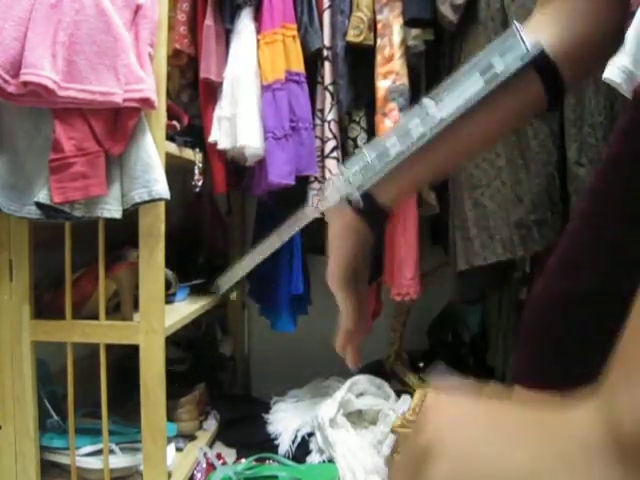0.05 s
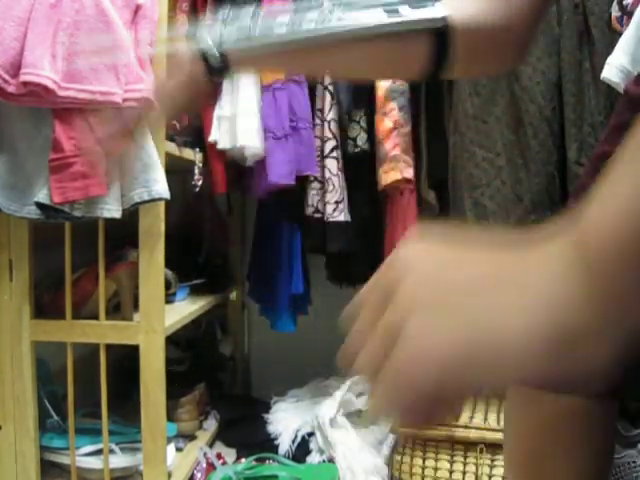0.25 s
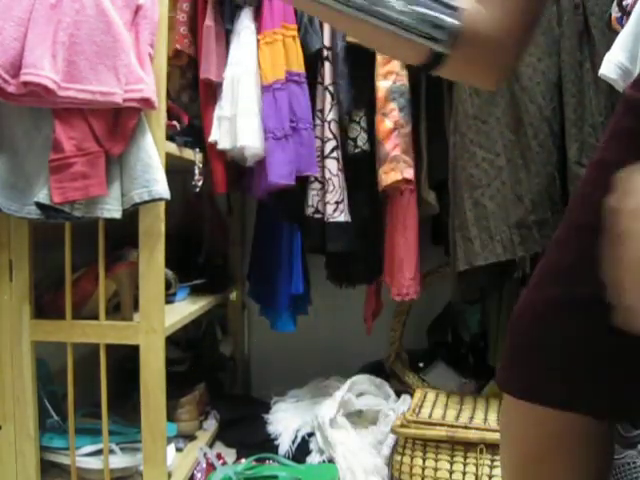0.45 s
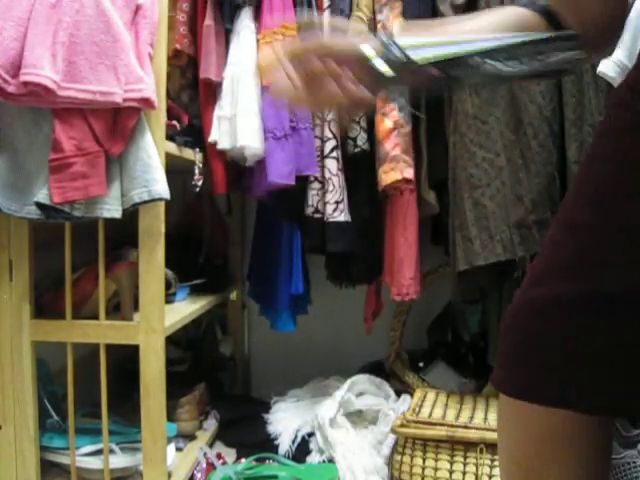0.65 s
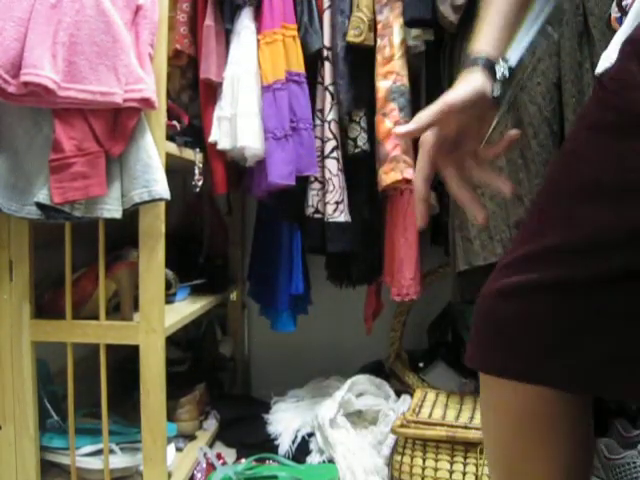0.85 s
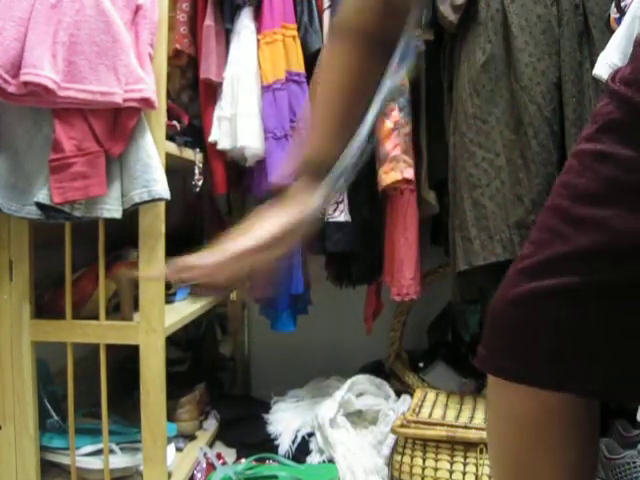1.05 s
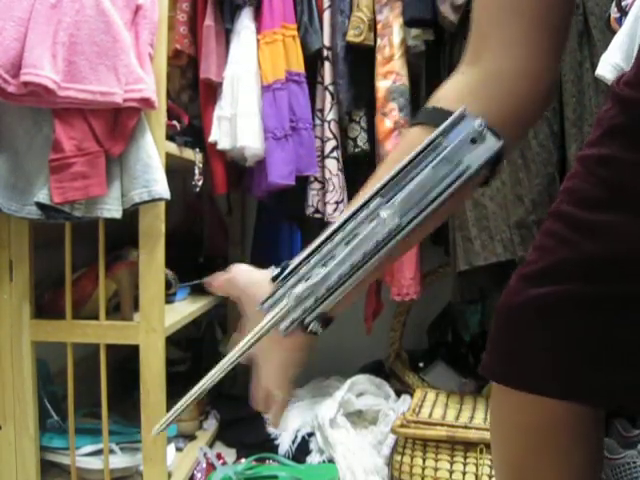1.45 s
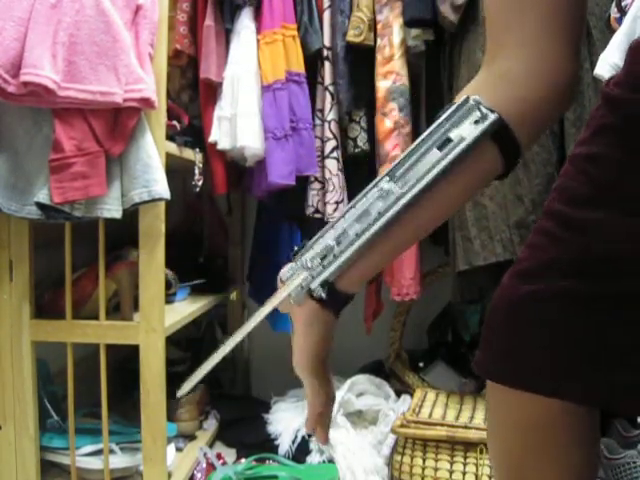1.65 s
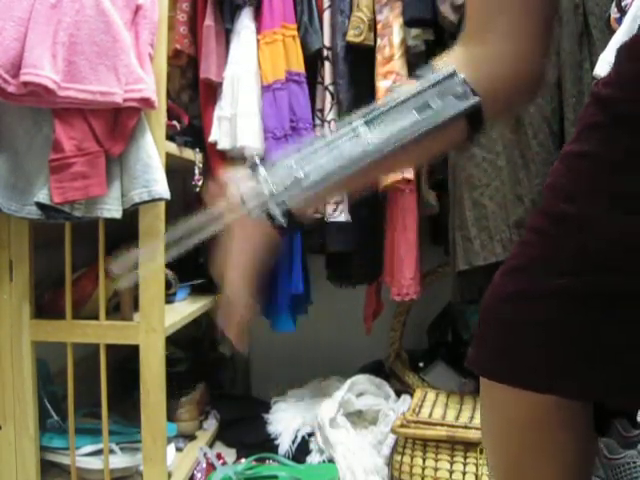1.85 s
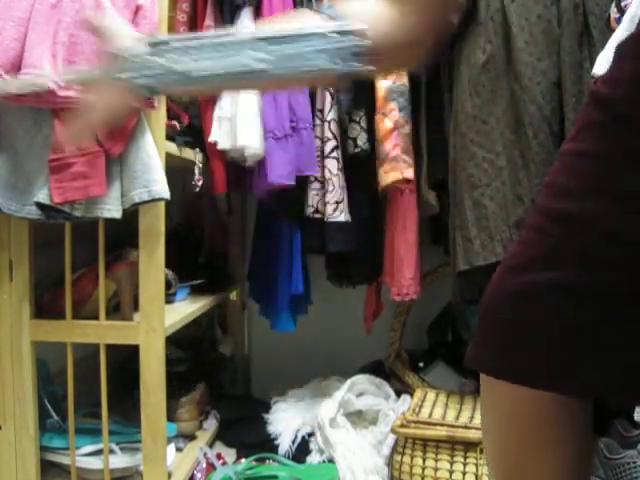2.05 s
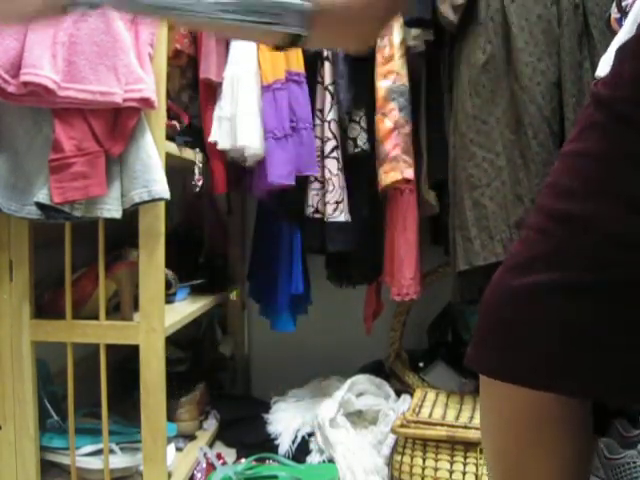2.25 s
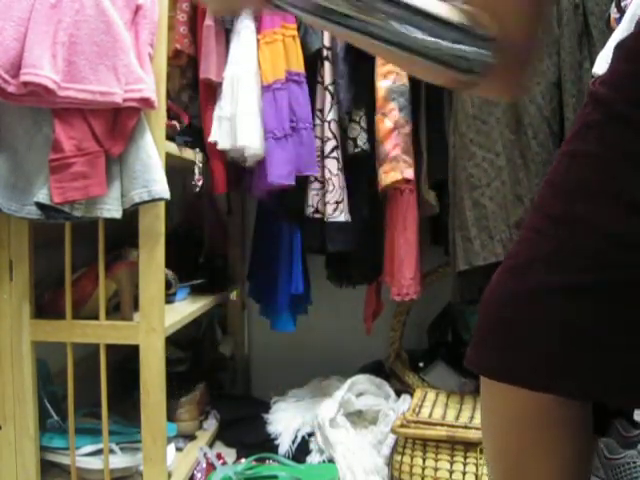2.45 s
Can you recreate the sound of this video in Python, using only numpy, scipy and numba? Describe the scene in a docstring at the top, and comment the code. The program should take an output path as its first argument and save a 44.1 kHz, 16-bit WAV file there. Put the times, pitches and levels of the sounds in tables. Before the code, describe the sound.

A homemade wrist blade slides into its housing at about 0.2 seconds with a bright metallic scrape and rattling clicks. It rattles briefly near 0.9 seconds, followed by a soft arm bump, then scrapes out and hits its stop with a sharp clack around 1.1. From 2.15 to 2.35 it clicks, scrapes and clacks back in. Everything is close, over faint arm rustle and low room noise.

```python
"""Close by in a quiet, cloth-filled room, an arm rustles faintly over a low room noise.
A homemade wrist blade slides back into its housing: the catch clicks, stick-slip friction scrapes
along the rail, the blade rattles and clacks against the end stop. The arm swings with a soft bump,
shifting the blade in its rail, and flicks it out. A second later the blade slides home again.
Each impact rings the housing and the blade's modes; hanging clothes soon absorb the reflections."""
import sys
import numpy as np
from scipy import signal
from scipy.fft import rfft, irfft
from scipy.io import wavfile
from scipy.ndimage import uniform_filter1d
from numba import njit

SR = 44100
rng = np.random.default_rng(int(sys.argv[2]) if len(sys.argv) > 2 else 0)


def file_out(sig):
    """Save sig as 16-bit WAV at sys.argv[1]."""
    # one column per channel
    cols = np.atleast_2d(sig).T
    # limit, then scale
    lim = np.clip(cols, -1, 1)
    pcm = np.round(lim * 32767).astype(np.int16)
    wavfile.write(sys.argv[1], SR, pcm)


N = 114660
T = np.arange(N) / SR


def undb(db):
    return 10 ** (np.asarray(db) / 20)


def unit(x):
    return x / np.sqrt(np.mean(x ** 2))


def fade(t, t60):
    """Exponential damping: 60 dB down after t60 seconds."""
    return np.exp(-np.log(1000) * t / t60)


def curve(points):
    """Amplitude envelope through (s, dB) points, silent outside them."""
    s, db = np.array(points).T
    return undb(np.interp(T, s, db)) * (T >= s[0]) * (T <= s[-1])


def colour(x, points, tilt=0, focus_hz=1000, focus_db=0):
    """Minimum-phase filter of unit power: (Hz, dB) points, treble tilt in dB per octave, one focus band."""
    size, tilt_from_hz, focus_octaves = 2048, 7200, 0.11
    hz, db = np.array(points).T
    octave = np.log2(np.maximum(np.arange(size // 2 + 1) * SR / size, 10))
    db = np.interp(octave, np.log2(hz), db) + tilt * np.maximum(octave, np.log2(tilt_from_hz))
    db += focus_db / (1 + ((octave - np.log2(focus_hz)) / focus_octaves) ** 2)
    cepstrum = irfft(np.log(undb(db)))
    cepstrum[1:size // 2] *= 2  # folding makes the filter causal
    cepstrum[size // 2 + 1:] = 0
    response = irfft(np.exp(rfft(cepstrum)))
    return signal.fftconvolve(x, response / np.linalg.norm(response))[:len(x)]


def noise(points):
    return unit(colour(rng.standard_normal(N), points))


@njit
def moving_band(x, hz, width):
    """State-variable band-pass with a moving centre, gain 1 there."""
    y, band_state, low_state = np.empty(len(x)), 0., 0.
    for i in range(len(x)):
        g, damping = np.tan(np.pi * hz[i] / SR), width / hz[i]
        band = (band_state + g * (x[i] - low_state)) / (1 + g * (g + damping))
        band_state = 2 * band - band_state
        low_state += 2 * g * band
        y[i] = damping * band
    return y


# Spectrum of the room noise. Each row: frequency in Hz, relative level in dB.
ROOM_SPECTRUM = [(12, -30), (20, 0), (113, -5.5), (198, -12), (319, -7.5), (388, -14.5), (459, -12.5),
                 (499, -17.5), (558, -8.5), (738, -17), (976, -18.5), (2080, -23.5), (2320, -27),
                 (2990, -26), (4540, -29.5), (7310, -33.5), (16000, -42.5)]


def room_noise():
    """Stationary random noise, strongest in the deep bass."""
    return undb(-55) * noise(ROOM_SPECTRUM)


# Envelopes of arm rustle, room and body rumble, and arm bump. Each row: time in seconds, level in dB.
RUSTLE_LEVELS = [(0, -57.5), (.05, -59), (.09, -65), (.22, -75), (.45, -67), (.6, -72), (.76, -64.5),
                 (.82, -58.5), (1.2, -65), (1.42, -68), (1.68, -62.5), (1.9, -69.5), (2.1, -67), (2.4, -69),
                 (2.6, -82)]
RUMBLE_LEVELS = [(0, -55.5), (.25, -59), (.4, -82), (.65, -67), (.85, -58.5), (1.3, -68), (1.65, -57.5),
                 (2.05, -57.5), (2.3, -60), (2.6, -58)]
BUMP_LEVELS = [(.94, -63), (.96, -50), (.97, -41), (.982, -53.5), (1.0, -52), (1.03, -64.5)]
# Their spectra. Each row: frequency in Hz, relative level in dB.
RUSTLE_SPECTRUM = [(150, -3.5), (600, 12.5), (1500, 1.5), (3000, -2.5), (7000, -4.5), (11000, -9.5),
                   (16000, -16.5)]
RUMBLE_SPECTRUM = [(20, 2.5), (35, 2.5), (60, -1.5), (110, -7), (170, -12), (260, -15.5), (500, -20),
                   (2000, -44)]
BUMP_SPECTRUM = [(30, -10), (90, 0.5), (200, -12.5), (320, -8.5), (620, -5.5), (900, -23.5), (3000, -37)]


def arm():
    """Amplitude-modulated noise: rustle, rumble and a soft bump follow the arm's motion."""
    rustle = noise(RUSTLE_SPECTRUM) * curve(RUSTLE_LEVELS)
    rumble = noise(RUMBLE_SPECTRUM) * curve(RUMBLE_LEVELS)
    bump = noise(BUMP_SPECTRUM) * curve(BUMP_LEVELS)
    return rustle + rumble + bump


def room_reflections(x, level_db=-12.5, delay_s=0.0013, treble_hz=8200):
    """Porous absorption: hanging clothes soon swallow the reflections, the treble first."""
    t = T[:SR // 4]
    echoes = rng.standard_normal(len(t)) * (t > delay_s)
    low = signal.sosfilt(signal.butter(4, treble_hz, fs=SR, output="sos"), echoes)
    high = signal.sosfilt(signal.butter(4, treble_hz, "high", fs=SR, output="sos"), echoes)
    tail = low * fade(t, t60=0.11) + high * fade(t, t60=0.066)
    response = colour(tail, [(200, 4), (4500, -10.5), (9000, -8), (16000, -0.5)])
    return x + undb(level_db) * signal.fftconvolve(x, response / np.linalg.norm(response))[:N]


def friction(size, slips_per_s=5400, spread_db=3):
    """Stick-slip friction of metal on metal: a dense train of uneven impulses."""
    slips = (rng.random(size) < slips_per_s / SR) * rng.choice([-1., 1.], size)
    return unit(slips * undb(spread_db * np.clip(rng.standard_normal(size), -2, 2)))


# Response of the housing to friction. Each row: frequency in Hz, relative level in dB.
SCRAPE_SPECTRUM = [(200, -41), (700, -34), (1300, -22), (2100, -16.5), (2600, -7.5), (3600, -6.5),
                   (4400, 1.5), (7300, -1.5), (10300, -12), (11700, -11), (13200, -28), (16000, -22.5)]
# Envelope of the blade's shifting. Each row: time in seconds, level in dB.
SHIFT_LEVELS = [(.81, -74.5), (.83, -55.5), (.852, -48), (.87, -28.5), (.895, -64), (.907, -87),
                (.93, -60.5), (.944, -42.5), (.954, -51), (.965, -45), (.985, -61.5), (1.0, -83.5)]


def shift():
    """Light friction excites the housing as the swinging arm shifts the blade in its rail."""
    return colour(friction(N) * curve(SHIFT_LEVELS), SCRAPE_SPECTRUM, tilt=.3, focus_hz=3060, focus_db=9.5)


# Scrape envelopes of strokes 0, 1 and 2. Each row: time in seconds, level in dB.
FIRST_RETURN_LEVELS = [(.222, -60.5), (.245, -40), (.256, -29), (.275, -30.5), (.287, -37.5), (.294, -18.5),
                       (.301, -34), (.307, -25), (.320, -36), (.332, -23.5), (.345, -32), (.36, -39),
                       (.372, -70)]
THROW_LEVELS = [(1.003, -65.5), (1.016, -45), (1.025, -26), (1.040, -29.5), (1.058, -26.5), (1.068, -29.5),
                (1.088, -37.5), (1.10, -61)]
SECOND_RETURN_LEVELS = [(2.198, -48), (2.21, -33), (2.225, -39.5), (2.241, -39.5), (2.248, -27.5),
                        (2.259, -35.5), (2.266, -27), (2.278, -25), (2.30, -32.5), (2.326, -27.5),
                        (2.352, -53.5), (2.37, -58)]
# Rail resonances. Each row: frequency in Hz, bandwidth in Hz, relative gain in dB in strokes 0, 1 and 2.
RAIL_MODES = [(1940, 170, -18, -5, -2.5), (2680, 100, -1, -16, 7), (2902, 100, 1.5, -6.5, 2),
              (4150, 52, 0.5, 0, 18), (4345, 350, -4.5, 8, -10), (4960, 88, -5.5, 2, 7.5),
              (5750, 140, 16.5, 7, -4.5), (7000, 160, 1.5, -6, -19), (9300, 600, -15.5, -2, -18)]
# The band that follows the contact point, one list per stroke. Each row: time in seconds, centre in Hz.
CONTACT_GLIDES = [
    [(.256, 5060), (.30, 4190), (.32, 3530), (.335, 2600)],
    [(1.015, 4230), (1.036, 4150), (1.055, 5400)],
    [(2.24, 4470), (2.28, 4380), (2.295, 4900), (2.33, 4250)],
]


def scrape(levels, stroke, tilt, glide_db):
    """Forced vibration: slips drive the housing, the rail and a band gliding with the contact point."""
    start, size = int(levels[0][0] * SR), SR // 4
    span, out = slice(start, start + size), np.zeros(N)
    impulse = signal.unit_impulse(SR // 20)
    response = colour(impulse, SCRAPE_SPECTRUM, tilt)
    for hz, width, *stroke_db in RAIL_MODES:
        b, a = signal.iirpeak(hz, hz / width, fs=SR)
        response += 2 * undb(stroke_db[stroke]) * signal.lfilter(b, a, impulse)
    force = curve(levels)[span]
    centre_hz = np.interp(T[span], *np.array(CONTACT_GLIDES[stroke]).T)
    glide = friction(size)
    for _ in range(2):  # two passes, each 520 Hz wide
        glide = moving_band(glide, centre_hz, 520.)
    body = signal.fftconvolve(friction(size) * force, response / np.linalg.norm(response))[:size]
    out[span] = body + undb(glide_db) * unit(glide) * force
    return out


# Free vibration of the blade. Each row: frequency in Hz, relative level in dB, 60 dB decay in seconds.
RINGING_MODES = [(2538, -11, 0.063), (2877, -7.5, .07), (3240, -8, .05), (4190, -3.5, .07), (4390, -7, .09),
                 (4870, -14.5, 0.081), (5488, -5, 0.036), (5830, -5, 0.037), (7500, -11.5, .07),
                 (8430, -8.5, 0.075), (9040, -12.5, .05), (9860, -15, 0.078)]


def impacts(rows, spectrum, ring_db, crack=1.1, crack_s=.0005):
    """Impulse response: a sharp crack, a dense short ring of the housing and the blade's damped modes."""
    out, t = np.zeros(2 * N), T[:SR // 8]
    hz, db, t60 = np.array(RINGING_MODES).T
    modes = np.array([np.sin(2 * np.pi * f * t) * fade(t, decay) for f, decay in zip(hz, t60)])
    for start_s, level_db, tilt, housing_t60, focus_hz, focus_db in rows:
        envelope = fade(t, housing_t60) * (1 + crack * np.exp(-t / crack_s))
        burst = rng.choice([-1., 1.], len(t)) * envelope
        housing = colour(burst, spectrum, tilt, focus_hz, focus_db) / 2
        scatter, polarity = rng.standard_normal((len(hz), 2)).T
        mode_db = db + tilt * np.log2(hz / np.median(hz)) + 1.5 * scatter
        ring = (np.sign(polarity) * undb(mode_db)) @ modes
        start = int(start_s * SR)
        out[start:start + len(t)] += undb(level_db) * (housing + undb(ring_db) * ring)
    return out[:N]


# Catch clicks and rattles, then end-stop clacks. Each row: start in seconds, level in dB, tilt in dB per
# octave, housing's 60 dB decay in seconds, band the contact favours or damps in Hz, its gain in dB.
RATTLE_HITS = [(.2312, -18, 2.5, 0.05, 4900, -21.5), (.2460, -16, -3.5, .02, 7560, 15),
               (.2511, -7, 4, .022, 5900, 15), (.2695, -16, -1.5, 0.032, 6300, 6.5),
               (.2910, -22, 5, 0.022, 2600, 1.5), (.2945, -17, -20, 0.054, 5500, 22.5),
               (.3123, -17, -5.5, .02, 3300, 2.5), (.3251, -10.5, -8, .011, 3100, 8.5),
               (.3580, -22.5, -11.5, 0.015, 3000, 3), (.7073, -34, -14, 0.037, 2770, 3),
               (.7187, -36, -17.5, 0.037, 4420, 16.5), (.8515, -30, -5.5, 0.014, 3030, 14.5),
               (.8657, -16.5, -2.5, 0.012, 5880, 6), (.8732, -19, -4, 0.031, 4460, 8.5),
               (.8850, -29.5, -4.5, .015, 5800, 2), (.8908, -19, 10, 0.018, 8300, 17),
               (.9134, -42, -0.5, 0.027, 7000, 5.5), (.9334, -39, 6.5, .025, 6370, 0),
               (1.0785, -23.5, 9.5, 0.013, 5390, 1.5), (1.0832, -27.5, 0, 0.028, 1838, 15),
               (1.1115, -25, 6.5, 0.053, 4500, 10), (1.203, -51.5, -10, 0.048, 5600, 17),
               (2.1526, -14, -2.5, 0.037, 5640, -20.5), (2.1758, -36, 10, 0.023, 4320, 0.5),
               (2.1977, -23, 10.5, 0.015, 8400, 7), (2.2041, -19.5, -11.5, .035, 5700, 10.5),
               (2.2631, -31.5, 2.5, .025, 4200, 27), (2.2905, -13.5, 4.5, 0.027, 4900, 16),
               (2.2995, -9, -3.5, 0.012, 2420, 5), (2.3079, -12.5, -2, 0.01, 3160, 8.5),
               (2.3364, -16.5, -3, 0.0096, 4320, 9), (2.3490, -31, -10.5, 0.022, 4300, 22),
               (2.5598, -43.5, -14, 0.016, 3600, 19)]
STOP_HITS = [(.3398, 0.049, 0.79, 0.02, 10000, 12.6), (1.0622, 0.85, -2.5, 0.028, 4060, 6.2),
             (2.3153, 0.0035, 1.1, 0.019, 8650, 1)]
# Response of the housing to each kind of hit. Each row: frequency in Hz, relative level in dB.
RATTLE_SPECTRUM = [(200, -50), (700, -32.5), (1250, -15), (1600, -20), (2200, -23.5), (2600, -0.5),
                   (4200, -2.5), (6200, -3.5), (7700, 1.5), (10200, -13.5), (11700, -9.5), (13200, -20),
                   (16000, -22)]
STOP_SPECTRUM = [(200, -44), (480, -27.5), (780, -16.5), (2100, -15.5), (3000, -3.5), (4200, -3), (6500, 0),
                 (8400, -1.5), (10000, -3), (11700, -7.5), (16000, -12)]


def blade():
    """Friction and impact: the blade slides in, out and in, rattling and striking its end stop."""
    first_return = scrape(FIRST_RETURN_LEVELS, stroke=0, tilt=.3, glide_db=-7)
    throw = scrape(THROW_LEVELS, stroke=1, tilt=1.5, glide_db=2.5)
    second_return = scrape(SECOND_RETURN_LEVELS, stroke=2, tilt=-0.45, glide_db=-3)
    sliding = first_return + throw + second_return + shift()
    rattles = impacts(RATTLE_HITS, RATTLE_SPECTRUM, ring_db=-22.5)
    clacks = impacts(STOP_HITS, STOP_SPECTRUM, ring_db=-21.5)
    return sliding + rattles + clacks


def scene():
    """Superposition: the blade and its reflections, the arm and the room noise add in one channel."""
    return (room_reflections(blade()) + arm() + room_noise())[None]


def gain_control(x, limit_db=-13.5, recover_db_per_s=7.5, detect_s=0.0038):
    """Limiting: the gain drops at once on a loud clack and creeps back."""
    power = uniform_filter1d(x ** 2, int(detect_s * SR))
    over_db = np.maximum(10 * np.log10(np.maximum(power, 1e-12)) - limit_db, 0)
    recovered_db = recover_db_per_s * T
    return x * undb(recovered_db - np.maximum.accumulate(over_db + recovered_db, axis=-1))


def record(dry):
    """Limiting and soft saturation round the peaks; a steep low-pass cuts above 15750 Hz."""
    low_pass = signal.ellip(10, .2, 70, 15750, fs=SR, output="sos")
    return signal.sosfilt(low_pass, np.tanh(gain_control(dry)))


dry = scene()
out = record(dry)
file_out(out)
```